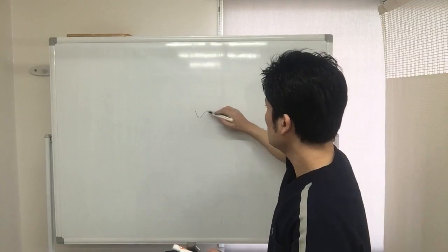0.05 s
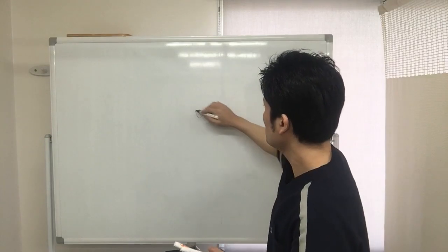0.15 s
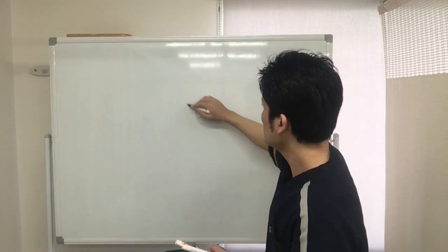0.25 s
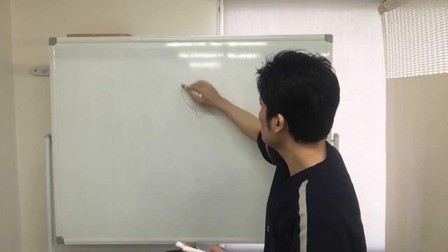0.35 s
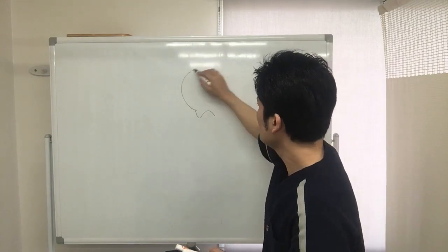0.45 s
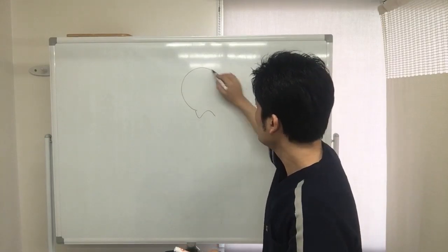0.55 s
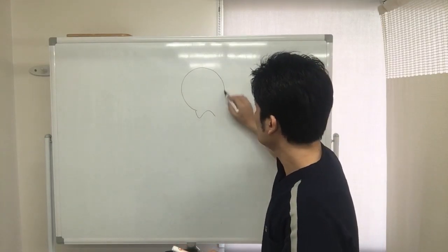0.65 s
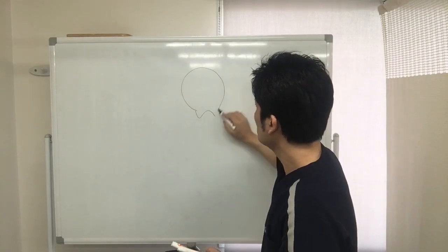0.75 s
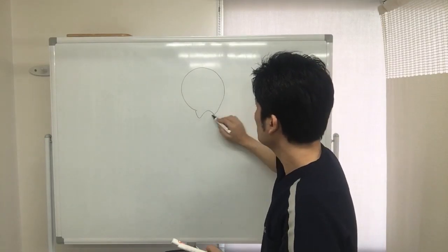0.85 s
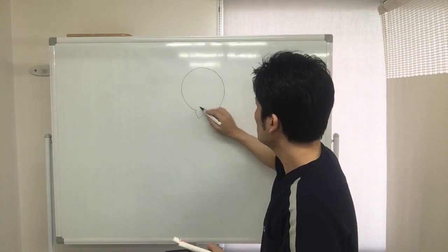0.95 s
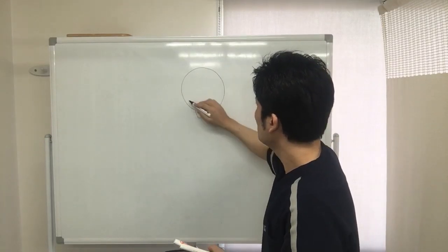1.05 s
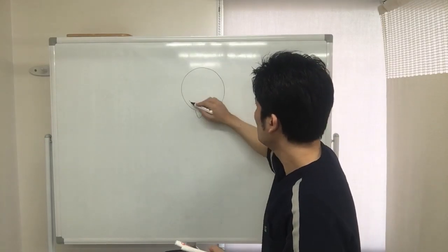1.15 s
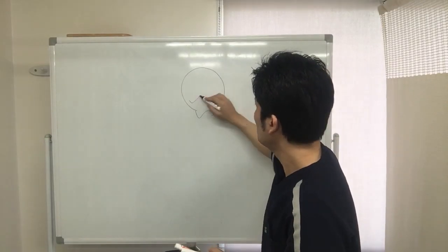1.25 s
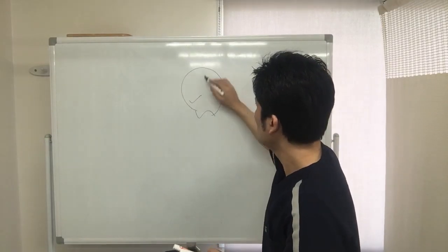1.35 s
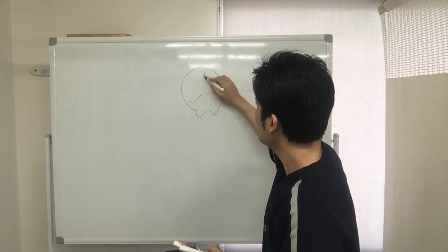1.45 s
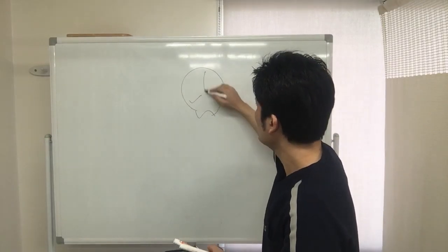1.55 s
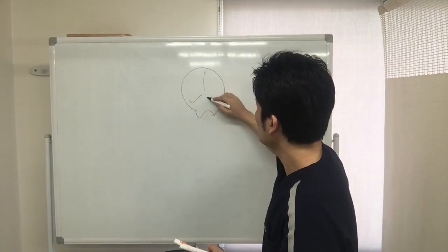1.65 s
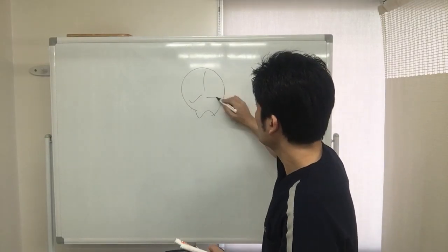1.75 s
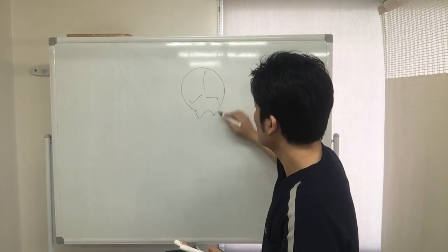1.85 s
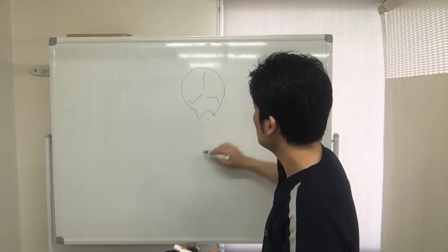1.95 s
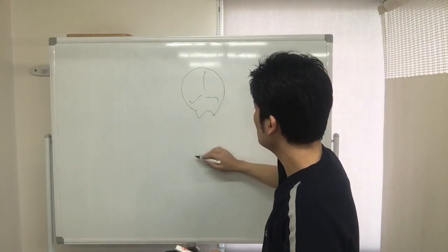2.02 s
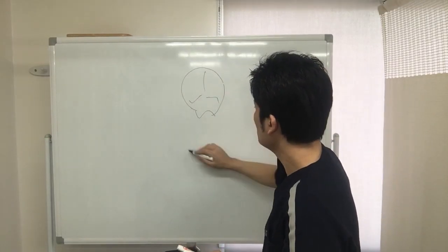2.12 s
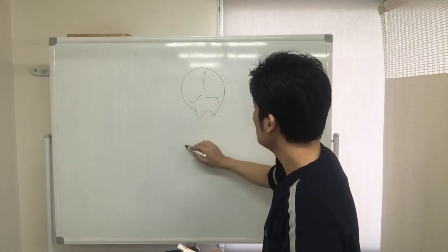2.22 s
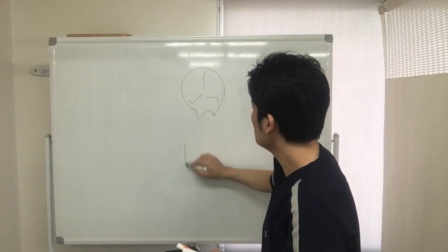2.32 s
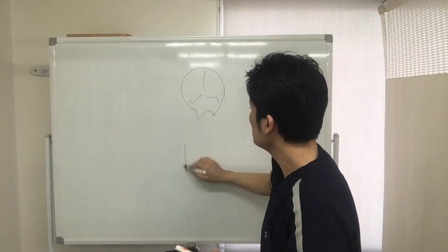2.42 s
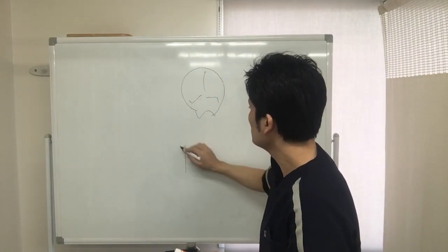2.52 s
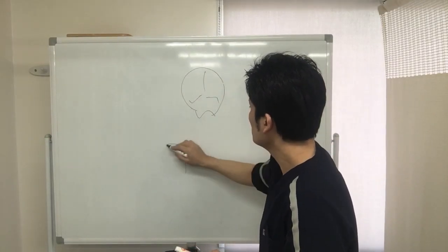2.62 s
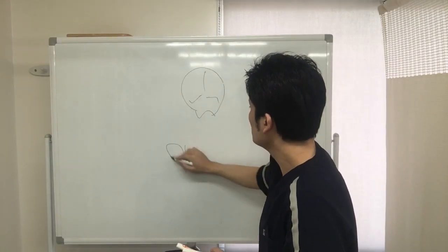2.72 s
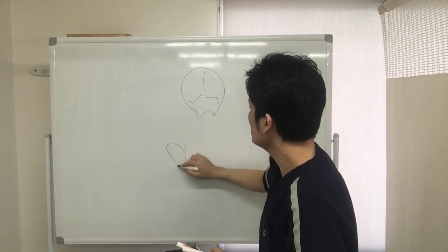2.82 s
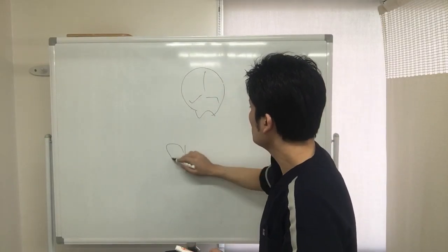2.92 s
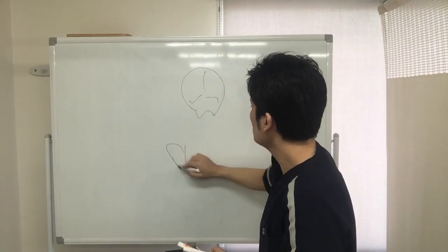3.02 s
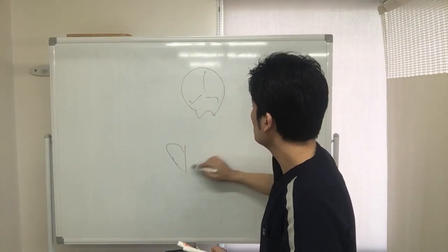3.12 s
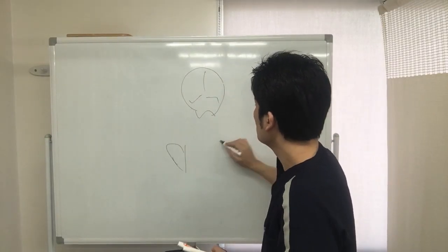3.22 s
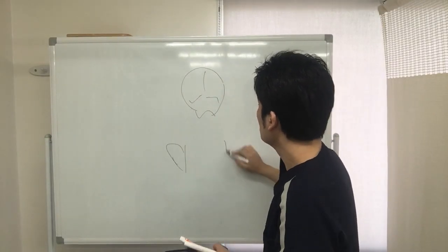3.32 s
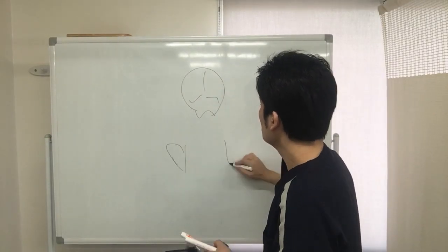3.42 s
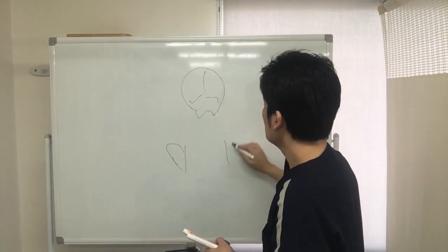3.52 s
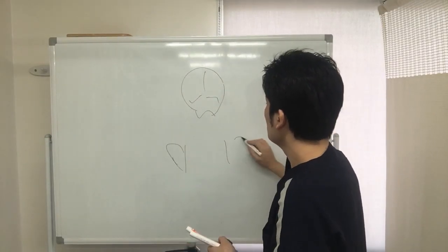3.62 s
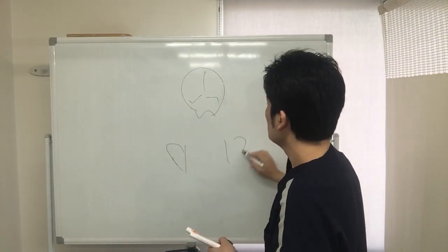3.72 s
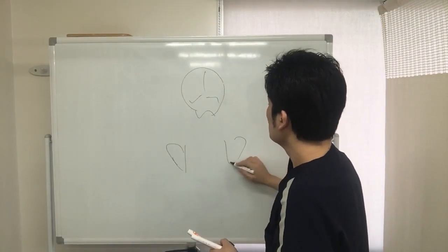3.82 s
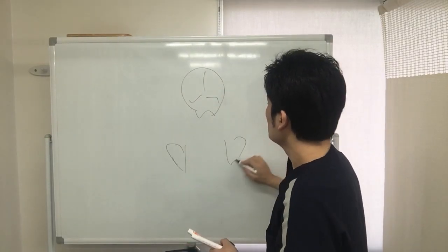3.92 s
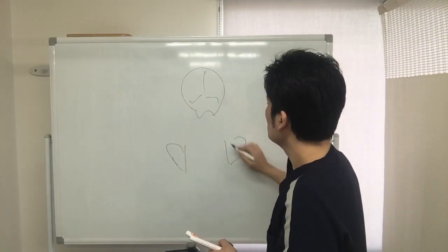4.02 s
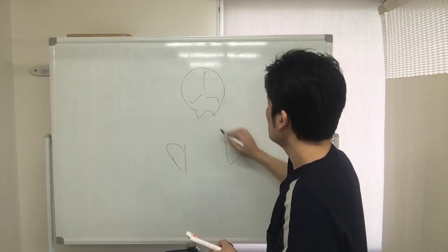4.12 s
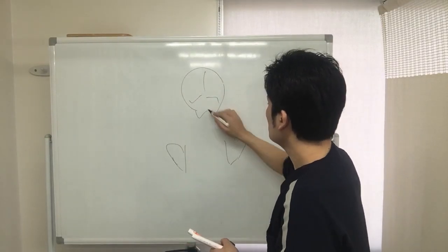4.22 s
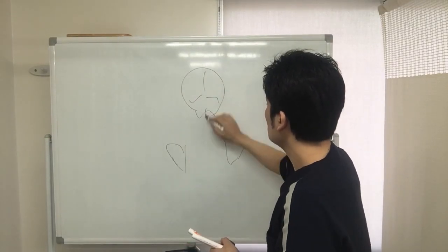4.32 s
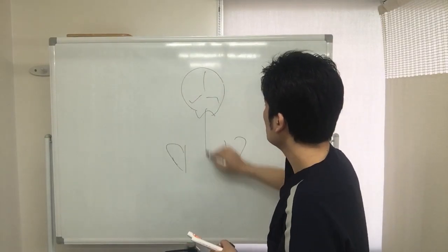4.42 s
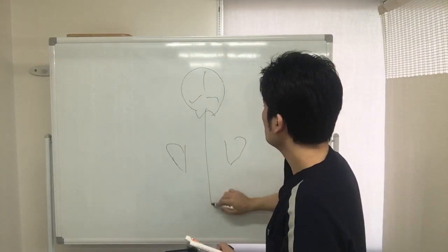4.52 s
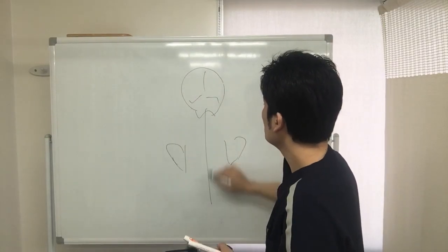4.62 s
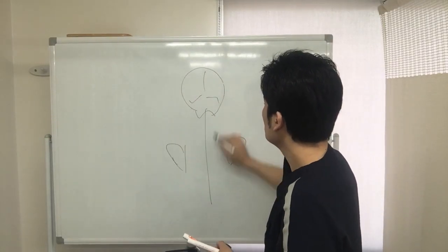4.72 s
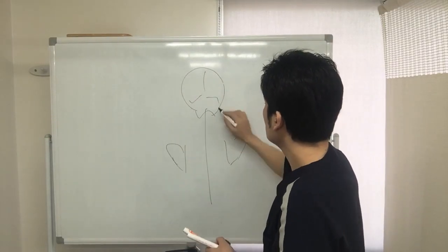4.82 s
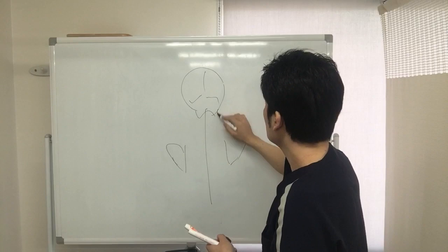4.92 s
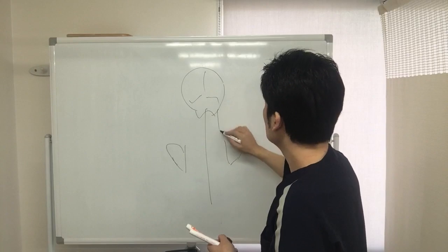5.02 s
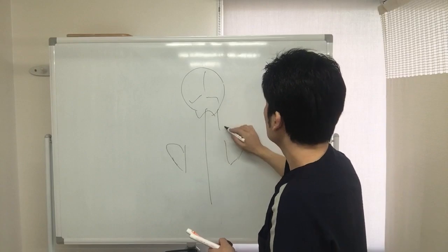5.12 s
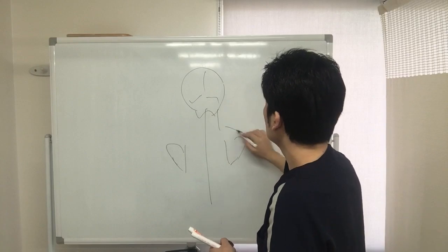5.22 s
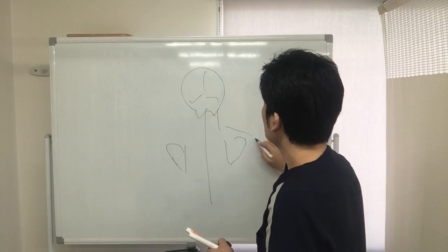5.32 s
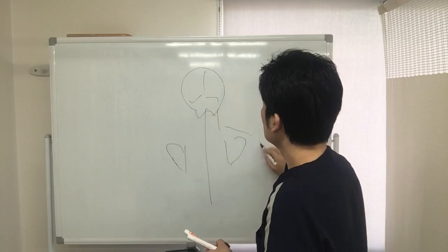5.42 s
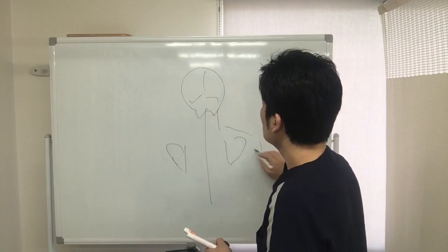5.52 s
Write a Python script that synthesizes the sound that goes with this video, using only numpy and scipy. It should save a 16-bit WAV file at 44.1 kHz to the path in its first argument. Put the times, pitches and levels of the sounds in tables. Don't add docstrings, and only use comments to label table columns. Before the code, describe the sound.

Someone draws on a whiteboard: hollow knocks with small plastic ticks, soft felt hisses and brief chatter over a low room hum.

```python
import sys
import numpy as np
from scipy import signal
from scipy.io import wavfile
from scipy.ndimage import uniform_filter1d

SR = 44100
rng = np.random.default_rng(int(sys.argv[2]) if len(sys.argv) > 2 else 0)


def amplitude_ratio(level_db):
    exponent = np.asarray(level_db, float) / 20
    return 10 ** exponent


def wrap_up_sound(samples):
    columns = np.atleast_2d(samples).T
    tamed = np.clip(columns, -1, 1)
    steps = np.round(tamed * 32767).astype(np.int16)
    wavfile.write(sys.argv[1], SR, steps)


N = 245195
T = np.arange(N) / SR
TAP_T = np.arange(SR // 2) / SR

# (time [s], blow [dB], then against the blow: panel boom [dB], panel knock [dB],
# tip hardness [dB])
TAPS = [(0.201, -29.5, -10.5, -20.5, -23), (1.115, -34.5, -7.5, -16, -20.5),
        (1.446, -32, -12, -17.5, -13.5), (1.628, -55.5, 3.5, -20, -14), (2.23, -38.5, -9.5, -27, -27.5),
        (2.491, -33, -9, -24, -23.5), (2.949, -30, -11.5, -27, -24), (3.303, -36.5, -4, -21, -21.5),
        (3.569, -30.5, -5.5, -20, -17), (3.906, -31.5, -6, -17.5, -18.5), (4.27, -27, -8.5, -19.5, -20),
        (4.888, -33, -2, -15, -14), (5.171, -33, -6.5, -19.5, -17.5), (5.401, -36, -8, -22, -34)]
# (frequency [Hz], width struck [Hz], width rubbed [Hz], level struck [dB], level rubbed [dB])
BARREL = [(3520, 590, 200, 30, 3.5), (3690, 1000, 290, -8, 0.5), (4160, 200, 460, -15, 0.5),
          (5420, 290, 800, 11, -10.5), (5700, 180, 900, 16, -19), (7250, 400, 310, -62, -11),
          (3120, 630, 240, -11, -6)]


def evened(x):
    return x / np.sqrt(np.mean(x ** 2) + 1e-20)


def read(points, hz):
    f, value = np.transpose(points)
    return np.interp(np.log(hz + 1), np.log(f + 1), value)


def add(mix, s, sound):
    part = mix[round(s * SR):][:len(sound)]
    part += sound[:len(part)]


def resonate(x, hz, width):
    pole = np.exp((2j * np.pi * hz - np.pi * width) / SR)
    return 2 * signal.lfilter([1 - abs(pole)], [1, -pole], x).real


def resonate_twice(x, hz, width, second_width):
    return evened(resonate(resonate(x, hz, width), hz, second_width))


def drift(rate_hz):
    rates = np.geomspace(rate_hz / 15, rate_hz, 16)
    return evened(sum(np.sin(2 * np.pi * (f * T + rng.random())) / np.sqrt(f) for f in rates))


def coloured(spectrum, patchy_db):
    hz = np.fft.rfftfreq(2048, 1 / SR)
    a, b, patches = rng.standard_normal((N // 512 + 5, len(hz), 3)).T
    patches = uniform_filter1d(patches, size=14, axis=0)
    patches = evened(uniform_filter1d(patches, size=6, axis=1))
    z = (a + 1j * b) * amplitude_ratio(read(spectrum, hz)[:, None] + patchy_db * patches)
    return signal.istft(z, nperseg=2048, noverlap=1536)[1][:N]


def air():
    # (frequency [Hz], density [dB per Hz])
    air_spectrum = [(12, -47), (20, -29.5), (70, -7), (123, -4), (172, -6.5), (459, -26), (642, -24.5),
                    (949, -26), (1400, -25.5), (3440, -31), (4940, -35), (6010, -36), (10500, -44.5),
                    (13200, -48), (16000, -54.5)]
    # (frequency [Hz], level [dB], waver [dB])
    hum_lines = [
        (119.9, -58.5, 2.5),
        (98.2, -64, -1),
    ]
    wash = coloured(air_spectrum, patchy_db=2.0)
    upper = signal.sosfilt(signal.butter(4, 1000, "high", fs=SR, output="sos"), wash)
    wash = amplitude_ratio(-69 + 1.0) * wash / np.std(upper)
    hum = 0
    for hz, db, waver_db in hum_lines:
        hum = hum + amplitude_ratio(db + waver_db * drift(8.2)) * np.sqrt(2) * np.sin(2 * np.pi * hz * T)
    rumble = resonate_twice(rng.standard_normal(N), 42, 25, 25)
    rumble_db, swell_db, swell_hz = -64, 2, 4
    return wash + hum + amplitude_ratio(rumble_db + swell_db * drift(swell_hz)) * rumble


def room(x):
    # (frequency [Hz], t60 [s])
    room_decay = [(150, 0.38), (500, 0.077), (1500, 0.28), (4000, 0.22), (9000, 0.15)]
    # (delay [s], level [dB])
    first_echoes = [
        (.0071, -23.5),
        (0.0111, -15),
        (0.0215, -20.5),
    ]
    sparse = np.zeros(SR // 2)
    at = np.arange(250, len(sparse) - 20, 20)
    sparse[at + rng.integers(0, 20, len(at))] = rng.choice([-1., 1.], len(at))
    hz, t, z = signal.stft(sparse, SR, nperseg=256)
    tail = signal.istft(z * amplitude_ratio(-60 * t / read(room_decay, hz)[:, None]), SR, nperseg=256)[1]
    tail *= amplitude_ratio(-12.0) / np.linalg.norm(tail)
    for delay, db in first_echoes:
        add(tail, delay, amplitude_ratio([db]))
    return signal.fftconvolve(x, tail)[:N]


def sway():
    # (time [s], level against boom [dB])
    reach = [(.2, -12), (1.1, -21), (1.45, -20), (2.23, -24), (2.5, -8), (2.95, -9), (3.3, -16),
             (3.9, -11.5), (4.9, -16.5), (5.3, -12)]
    sway_hz, t60, rise_s = 98.53, 1.22, 0.038
    out, t = np.zeros(N), np.arange(SR) / SR
    swell = (1 - np.exp(-t / rise_s)) ** 2 * np.sin(2 * np.pi * sway_hz * t)
    for s, blow_db, boom_db, *_ in TAPS:
        db = blow_db + boom_db + np.interp(s, *np.transpose(reach))
        add(out, s, amplitude_ratio(db + 8.0 - 60 * t / t60) * swell)
    return out


def strokes():
    # (middle [s], length [s], hiss [dB])
    hand_strokes = [(.01, 0.12, -73), (0.31, 0.35, -71), (0.597, 1, -73), (.93, 0.22, -83),
                    (1.228, .2, -75.5), (1.674, 0.87, -74.5), (2.053, 0.14, -73), (2.337, 0.11, -68.5),
                    (2.57, 0.28, -74.5), (2.771, 0.13, -70.5), (3.025, 0.099, -72), (3.37, 0.1, -68),
                    (3.677, .36, -75.5), (3.957, .16, -73), (4.34, .25, -73), (4.47, 0.19, -67.5),
                    (4.65, 0.4, -83), (4.983, 0.099, -70), (5.25, 0.16, -72.5)]
    resting_db, blunt = -96, 1.22
    middle, length, db = np.transpose(hand_strokes)[:, :, None]
    swell = np.cos(np.pi * np.clip((T - middle) / length, -.5, .5)).clip(0) ** blunt
    return amplitude_ratio(resting_db) + np.sqrt(((amplitude_ratio(db) * swell) ** 2).sum(0))


def felt():
    # (frequency [Hz], density [dB per Hz])
    felt_spectrum = [(700, -21), (1400, -1.5), (2400, -2.5), (3400, 4.5), (4700, 0.5), (5900, 3), (7200, 0),
                     (8500, -14.5), (9800, -10), (11000, -25)]
    level, hiss = strokes(), evened(coloured(felt_spectrum, patchy_db=1.8))
    top = signal.sosfiltfilt(signal.butter(2, 4600, "high", fs=SR, output="sos"), hiss)
    top = top + amplitude_ratio(-13) * evened(resonate(hiss, 5950, 130))
    bright = (level / amplitude_ratio(-71)) ** 0.2
    catches = evened(uniform_filter1d(rng.standard_normal(N), size=130))
    grain = amplitude_ratio(1.3 * drift(90) + 2.5 * catches)
    return level * grain * ((hiss - top) / np.maximum(bright, .5) + top * bright)


def squeaks():
    # (time [s], level [dB], length [s], frequency [Hz])
    squeak_events = [
        (0.78, -77, .12, 1400),
        (0.9, -75, .05, 1400),
        (1.84, -71, .03, 1520),
        (2.12, -74, .03, 1330),
        (5.09, -75, .08, 1700),
    ]
    out, slips = np.zeros(N), rng.standard_normal(N)
    for s, db, length, hz in squeak_events:
        size = round(length * SR)
        add(out, s, amplitude_ratio(db) * np.hanning(size) * evened(resonate(slips[:size], hz, 110)))
    return out


def chatter():
    # (time [s], level [dB], length [s])
    bursts = [(0.176, -54, 0.023), (0.197, -69, 0.11), (1.403, -61.5, 0.026), (1.591, -66.5, 0.035),
              (1.644, -69, .02), (1.808, -68, 0.023), (1.838, -64, 0.013), (2.088, -65.5, 0.026),
              (2.927, -59.5, 0.035), (3.637, -60, 0.022), (3.775, -60, 0.016), (3.79, -71, 0.035),
              (3.13, -70.5, .02), (4.035, -70.5, .025), (4.173, -72, 0.028), (4.208, -67, 0.02),
              (4.5, -73, 0.021), (5.105, -63, 0.03), (5.129, -70.5, 0.036), (5.202, -76, 0.076),
              (5.34, -72, 0.017)]
    out, slips = np.zeros(N), rng.standard_normal(N)
    rubbed = evened(sum(amplitude_ratio(d) * resonate_twice(slips, f, w, 4 * w) for f, _, w, _, d in BARREL))
    for s, db, length in bursts:
        at, size = round(s * SR), round(length * SR)
        fade = amplitude_ratio(db + 2.5 - 9 * np.arange(size) / size)
        add(out, s, fade * signal.windows.tukey(size, .12) * evened(rubbed[at:at + size]))
    return out


def panel_ring(favoured):
    # (frequency [Hz], level [dB], t60 [s])
    panel_modes = [(135.3, -18.5, 0.25), (166.25, -4.5, 0.57), (185.9, -2.5, 0.19), (210.8, -12.5, 0.28),
                   (236.8, -0.5, 0.31), (261.7, -9.5, 0.45), (299, -6.5, 0.44), (312, -13.5, 0.5),
                   (365.2, -3, 0.3), (401.5, -4, 0.24), (445.7, -4, 0.17), (534, -11.5, 0.32),
                   (519.5, 2.5, 0.14), (652, -12, 0.31), (694.6, 3, 0.14), (774.3, 4.5, 0.1),
                   (813, -1, 0.066), (895, -20, 0.13), (935, 6, 0.1)]
    t = TAP_T
    hz, db, t60 = np.transpose(panel_modes)[:, :, None]
    chance, detune = rng.standard_normal((2, len(hz), 1))
    humps = sum(amplitude_ratio(d) / (1 + ((hz / f - 1) / 0.39) ** 2) for f, d in favoured)
    rise = (1 - np.exp(-t * hz / 0.67)) ** 2
    ring = amplitude_ratio(db + 2.5 * chance - 60 * t / t60) * humps * rise
    phase = 2 * np.pi * hz * (1 + .012 * detune) * t + 2.31 * chance
    return (ring * np.sin(phase)).sum(0)


def spot_dent(favoured):
    t = TAP_T
    flex = np.sqrt(t / 0.007) * np.exp(.125 - 0.11 * (t / 0.0066) ** 4)
    return sum(amplitude_ratio(d + 0.0037 * (f - 306)) * -np.cos(2 * np.pi * f * t) * flex for f, d in favoured)


def core_thud(boom_hz, favoured):
    t, thud = TAP_T, 0
    bloom = (1 - np.exp(-(t / 0.0074) ** 2)) * amplitude_ratio(-25 * t - 9.3 * (t / 0.076) ** 2)
    for f, d in favoured:
        noise = resonate_twice(rng.standard_normal(len(t)), f, 0.85 * f, 0.85 * f)
        thud = thud + amplitude_ratio(d - 0.31 * (f - boom_hz) * t) * noise
    return bloom * thud


def face_clack(clack_db):
    t, grit = TAP_T, rng.standard_normal(len(TAP_T))
    # (frequency [Hz], width [Hz], level [dB])
    bands = [(1060, 220, 0), (1400, 276, 1.5), (1610, 250, -7.0), (2730, 580, -18.0)]
    clack = sum(amplitude_ratio(d) * evened(resonate(grit, f, w)) for f, w, d in bands)
    decay = amplitude_ratio(clack_db - 60 * t / 0.036) + amplitude_ratio(clack_db - 16.5 - 60 * t / 0.092)
    return clack * (1 - np.exp(-t / 0.0026)) * decay


def barrel_tick(edge_db):
    t = TAP_T
    jolt = np.diff(np.exp(-((t - .0002) / .00003) ** 2), prepend=0)
    rebound = amplitude_ratio(-26) * np.exp(-((t - .0057) / .001) ** 2)
    crack = jolt + rng.standard_normal(len(t)) * (amplitude_ratio(-27 - 60 * t / .05) + rebound)
    tick = sum(amplitude_ratio(d + edge_db * (f > 5000)) * resonate(crack, f, w) for f, w, _, d, _ in BARREL)
    return tick / abs(tick).max()


def tap(blow_db, boom_db, knock_db, tick_db):
    boom_hz, body_hz, knock_hz, body_db = 195.7, 350.6, 620, -14.5
    favoured = [(boom_hz, boom_db), (body_hz, body_db), (knock_hz, knock_db)]
    clack_db = 0.68 * tick_db + (1 - 0.68) * knock_db + 6.5
    edge_db = 1.6 * (tick_db - knock_db) - 1
    sound = amplitude_ratio(-5.5) * panel_ring(favoured)
    sound += amplitude_ratio(-4.5) * face_clack(clack_db)
    sound += amplitude_ratio(4.5) * spot_dent(favoured)
    sound += amplitude_ratio(-9) * core_thud(boom_hz, favoured)
    sound += amplitude_ratio(tick_db + 13) * barrel_tick(edge_db)
    return amplitude_ratio(blow_db) * sound


def marker():
    out = chatter() + squeaks()
    for s, *levels in TAPS:
        add(out, s + .0003, tap(*levels))
    soft = signal.sosfilt(signal.butter(N=8, Wn=7400, fs=SR, output="sos"), out)
    return soft + felt()


def scene():
    pen = marker()
    return (pen + room(pen) + sway() + air())[None]


def top_cut(x):
    return signal.sosfilt(signal.butter(12, 15780, fs=SR, output="sos"), x)


def record(dry):
    # (frequency [Hz], width [Hz], level [dB])
    mic_dips = [(10600, 870, -5), (4880, 190, -3)]
    for hz, width, db in mic_dips:
        dry = dry - (1 - amplitude_ratio(db)) * resonate(dry, hz, width)
    return top_cut(dry)


dry = scene()
out = record(dry)
wrap_up_sound(out)
```